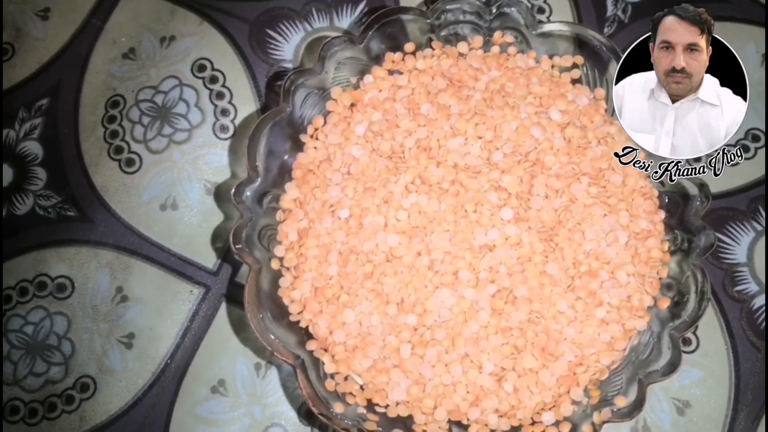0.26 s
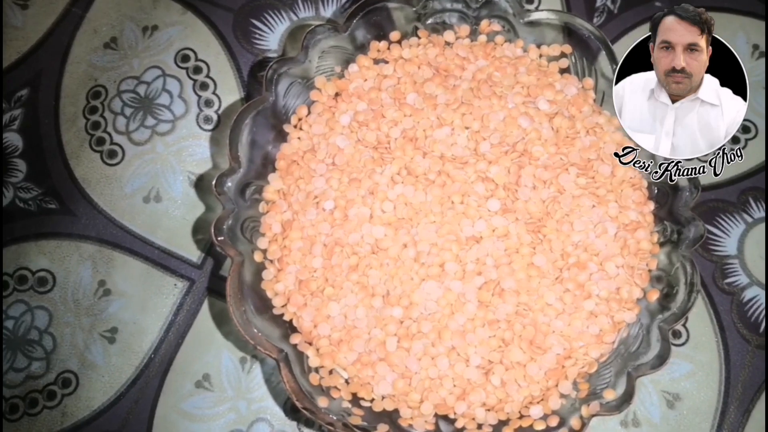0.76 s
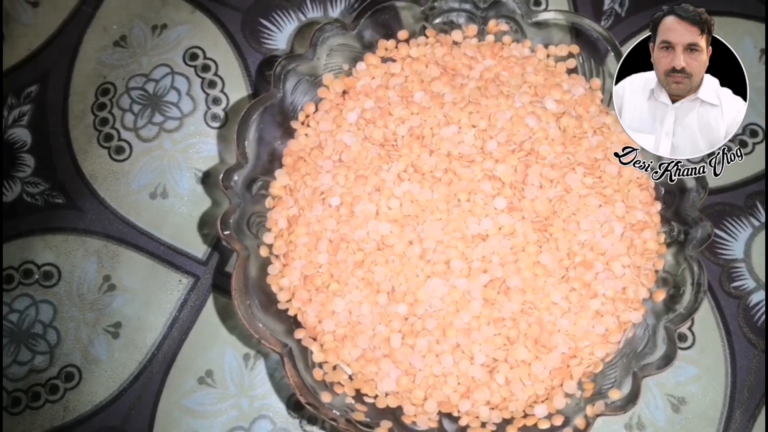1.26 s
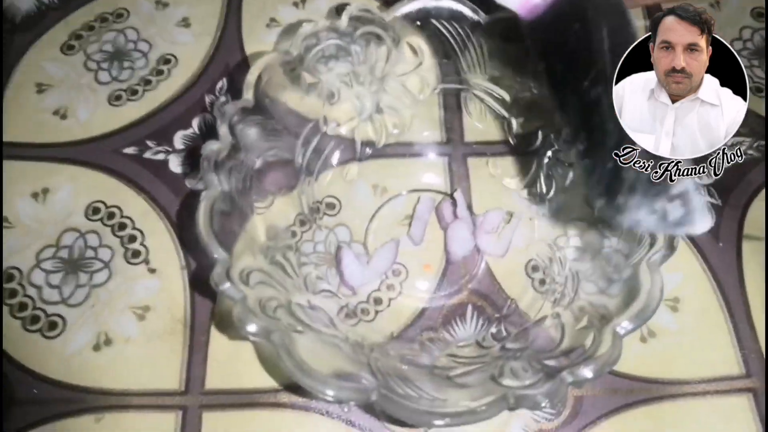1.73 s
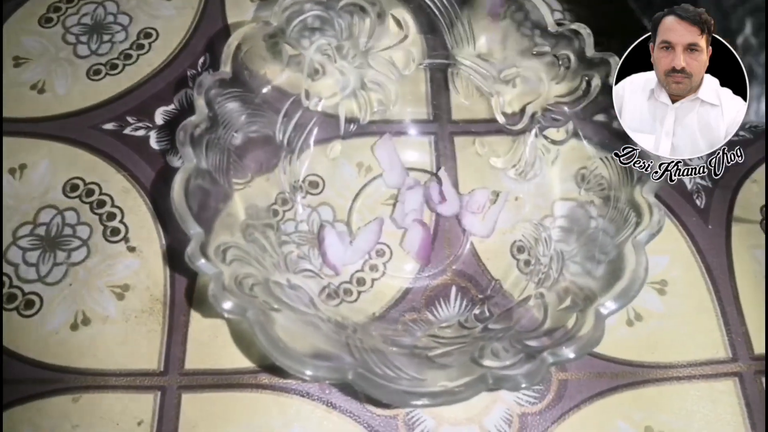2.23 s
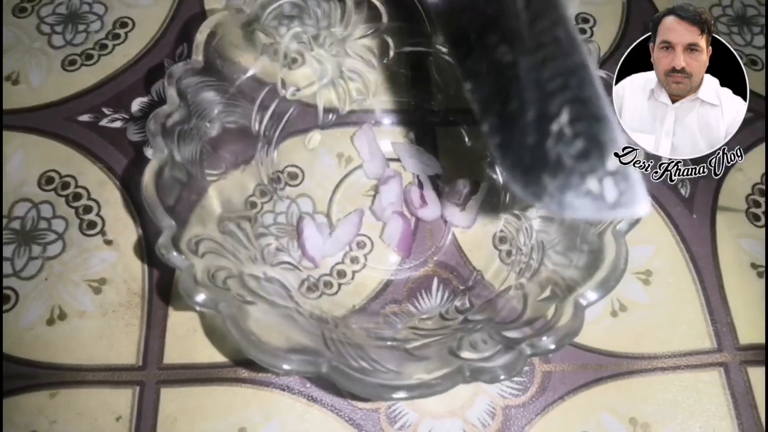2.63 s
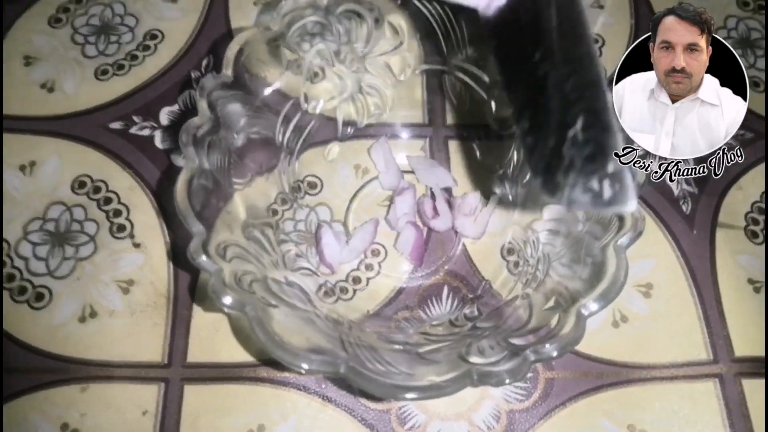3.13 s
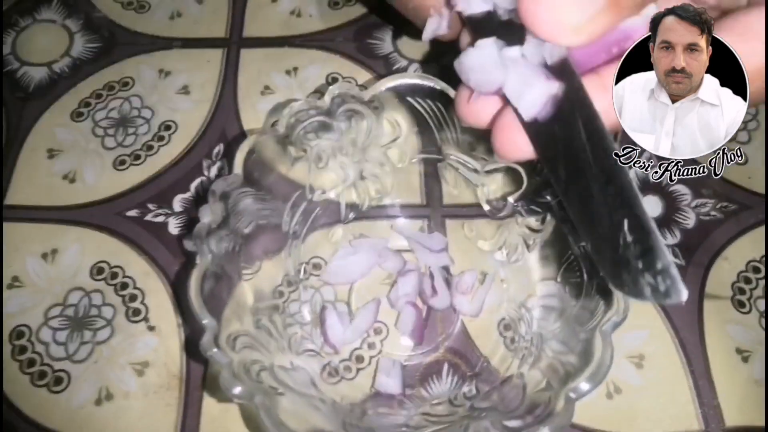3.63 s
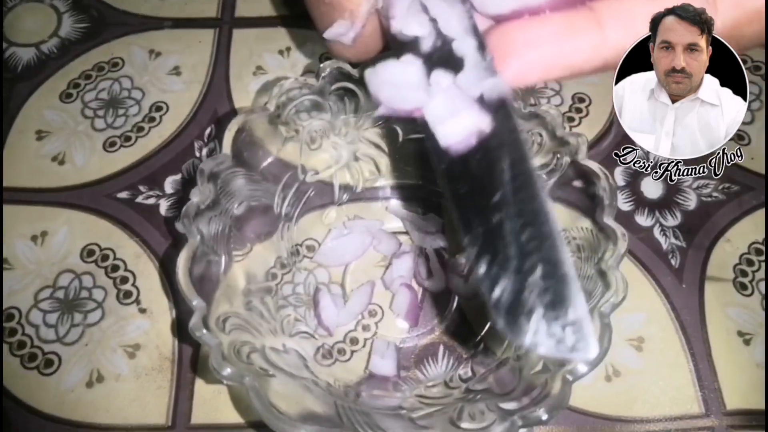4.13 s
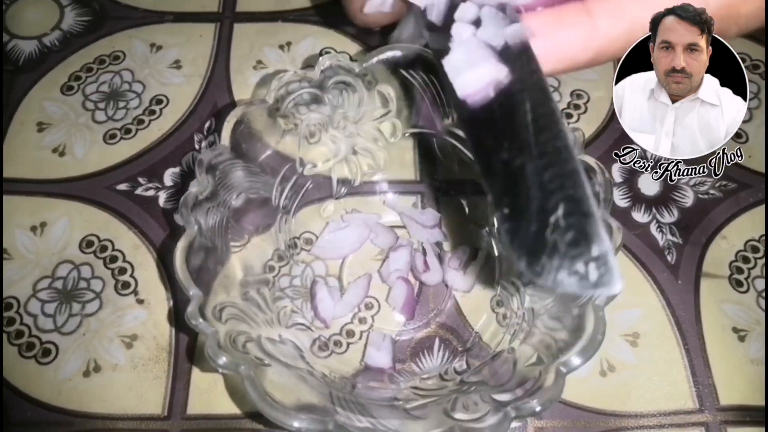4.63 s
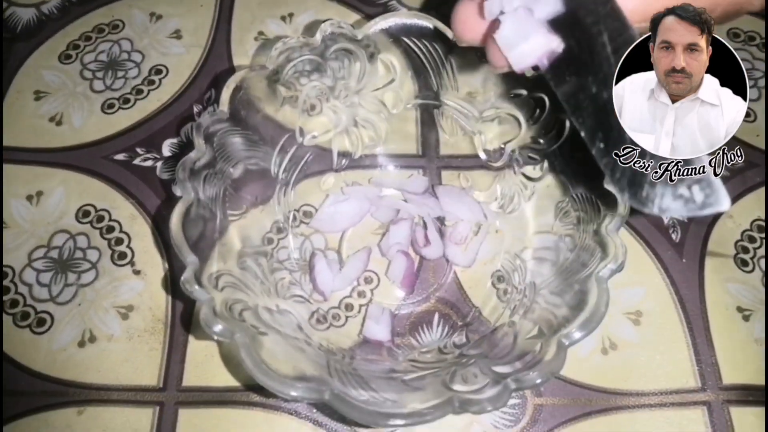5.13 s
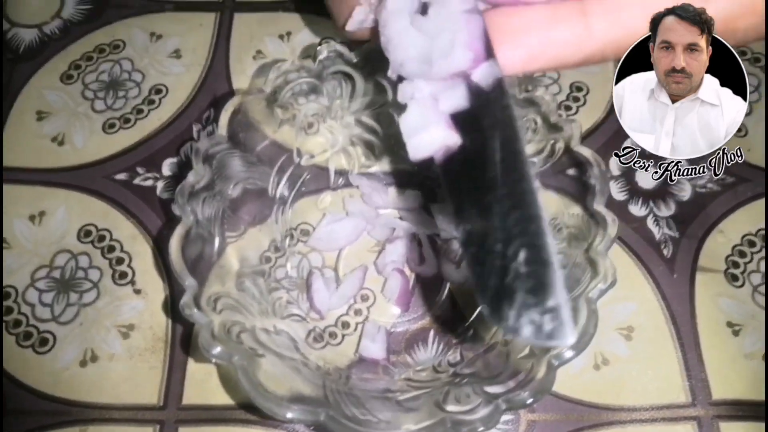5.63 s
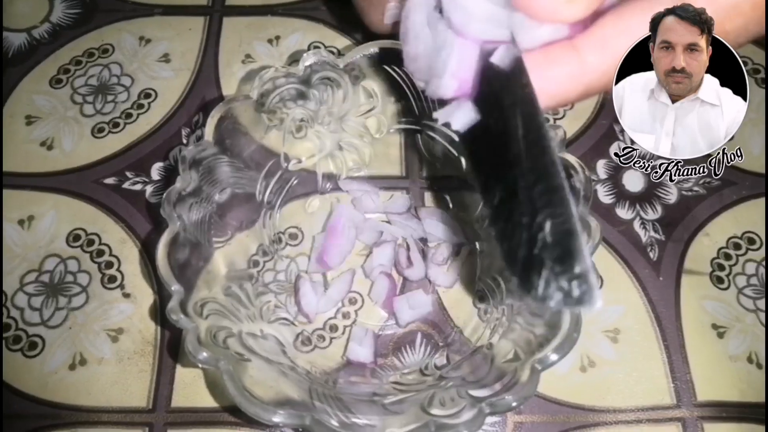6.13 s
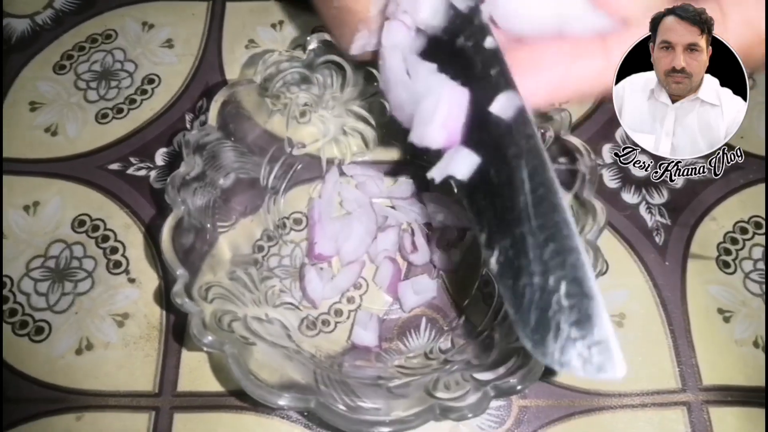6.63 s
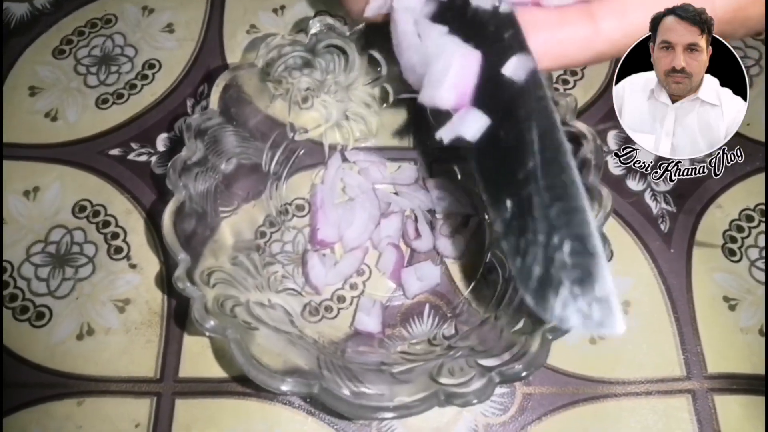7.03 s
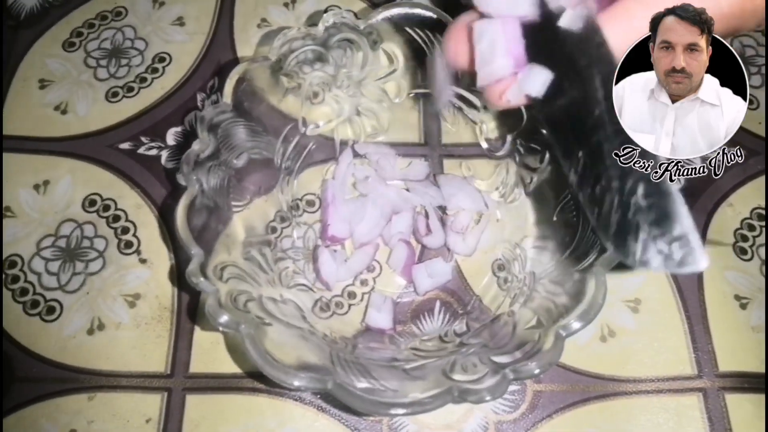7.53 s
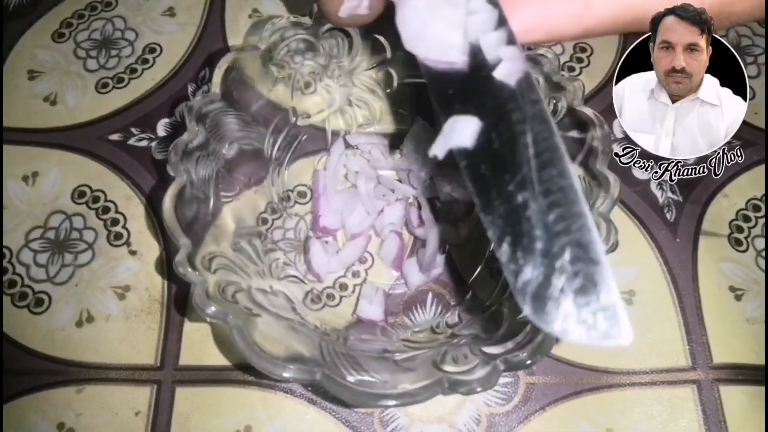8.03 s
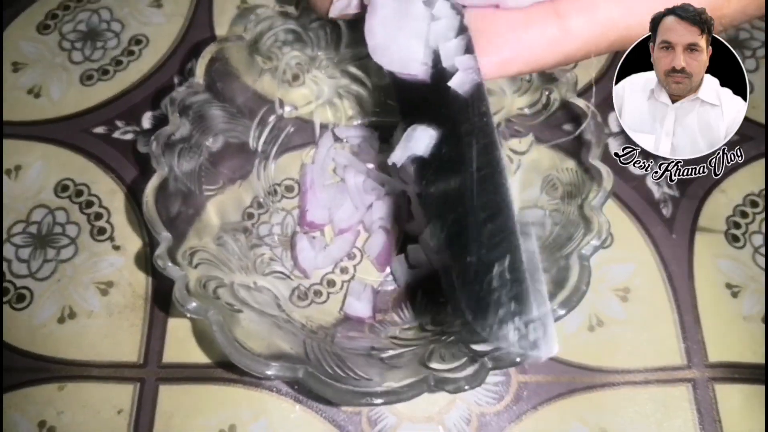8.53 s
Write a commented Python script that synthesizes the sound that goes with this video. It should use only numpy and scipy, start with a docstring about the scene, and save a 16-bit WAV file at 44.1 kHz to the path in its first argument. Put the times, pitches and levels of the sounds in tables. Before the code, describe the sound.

In a small, slightly echoing room, a close hand-held microphone picks up dry lentils in a glass bowl. Faint sliding comes first, then two loud gritty scuffs with a glassy ring at about 0.1 and 0.25 seconds. From 0.4 to 1.3 seconds lentils swish softly and tick sharply, ending with a short dull knock near 1.27. Total silence falls from 1.37 to 1.77. Then a far quieter scene: irregular short knife crunches through onion, a few each second, crisp and moist, climbing slightly, with rasp and fine fizz. Juice sprays faintly near 2.8, 4.7 and 8.55. Cuts are stronger around 4.8, 6.5, 8.0 and 8.6. Tiny ticks and weak knocks land between them, including near 6.1 and 6.5. Faint rustle and a wavering low hum continue, with handling rumble swelling around 7.3 to 7.6.

```python
"""A kitchen knife crunches through an onion over a glass bowl: bursts of tiny fractures, resonated and coloured.
Before it, dry lentils slide and tick as small contacts in a glass bowl whose scuffs ring its modes.
A short silence parts the two scenes. Juice fizzes, bits tick and a few knocks land among the cuts.
A small room with short echoes, a close hand-held microphone that rumbles, a faint rustle throughout,
and a low hum behind the onion."""
import sys
import numpy as np
from scipy import signal
from scipy.io import wavfile
from scipy.ndimage import uniform_filter1d

SR = 44100
rng = np.random.default_rng(int(sys.argv[2]) if len(sys.argv) > 2 else 0)


def digitize_waveform(pressure):
    """Quantize a signal to 16-bit integers and store it at the path in sys.argv[1].

    Rows of a 2-D input are taken as channels; values are limited to [-1, 1].
    """
    field = np.atleast_2d(pressure).T
    bounded = np.clip(field, -1, 1)
    quanta = np.round(bounded * 32767).astype(np.int16)
    wavfile.write(sys.argv[1], SR, quanta)


N = 387146
TIME = np.arange(N) / SR

# Lentils sliding over each other. Each row: start in seconds, length in seconds, level in dB, pitch in Hz.
LENTIL_SLIDES = [(0, 0.057, -48, 1880), (0.052, .07, -40, 1640), (0.389, 0.093, -44, 2460),
                 (0.476, 0.049, -40.5, 2060), (0.563, 0.097, -42.5, 2100), (0.729, .19, -49, 2300),
                 (1.016, 0.15, -43, 2650), (1.313, 0.053, -40, 2400)]
# The bowl scuffing over the table. Each row: start, peak and end in seconds, level in dB,
# contact point on the bowl (0-1), fall from the peak to the end in dB.
BOWL_SCUFFS = [(0.099, 0.115, 0.22, -27, 0, 16), (0.251, 0.263, 0.36, -27.5, 0.82, 5.5)]
# Modes of the glass. Each row: pitch in Hz, time to fall 60 dB in seconds,
# relative level in dB when touched at contact point 0, and at contact point 1.
GLASS_MODES = [(716, 0.23, -14.5, 2), (1223, 0.15, -19.5, 11.5), (1310, 0.082, -11, 7),
               (1634, 0.05, -3.5, 14.5), (1696, 0.25, 8.5, 1), (1821, 0.1, 13.5, -7.5),
               (2166, 0.21, 4, -13), (2552, 0.097, -11, 14.5), (2850, 0.13, -9.5, 3), (3365, 0.19, 8, -9.5),
               (4644, 0.049, 6, 0)]
# Single lentils and bits of onion that tick. Each row: time in seconds, peak in dB ahead of the room.
LOUD_TICKS = [(0.4546, -20.5), (0.515, -21.5), (0.565, -22), (0.7274, -28.5), (0.7782, -27), (0.8533, -28),
              (1.2068, -31.5), (1.311, -27.5), (2.82, -43.5), (3.147, -36), (4.5078, -40), (6.915, -47)]
# Dull knocks on the bowl. Each row: time in seconds, level of the note in dB, pitch in Hz, decay time in seconds.
BOWL_KNOCKS = [(1.271, -26.5, 1274, 0.0092), (2.465, -50, 1035, 0.011), (6.075, -50.5, 880, 0.0025),
               (6.468, -44, 1040, 0.0015)]
# Knife strokes. Each row: start in seconds, length in seconds, place of the peak (0-1), crunch level in dB,
# crunch pitch at the start in Hz, rasp level in dB, fizz level in dB.
KNIFE_STROKES = [(1.763, 0.016, 0.05, -49.5, 2620, -48, -50), (2.037, .04, 0.6, -52.5, 2070, -68, -73),
                 (2.112, 0.1, .65, -50.5, 2200, -62, -60.5), (2.277, 0.12, 0.08, -51.5, 1990, -53.5, -56.5),
                 (2.464, 0.17, 0.3, -53.5, 2020, -60, -64), (2.68, 0.17, 0.54, -52, 1750, -59, -60.5),
                 (2.894, 0.18, 0.32, -44.5, 1590, -50.5, -53), (3.064, 0.096, 0.3, -59, 1810, -56.5, -56.5),
                 (3.23, 0.077, 0.7, -55.5, 1880, -68, -65), (3.348, 0.07, .4, -55, 2250, -57, -55),
                 (3.593, 0.1, 0.22, -43.5, 2000, -44.5, -66), (3.77, 0.12, 0, -57.5, 1950, -59.5, -59.5),
                 (3.939, 0.083, 0.2, -53, 1830, -62, -61), (4.1, .11, 0.14, -46, 1800, -49.5, -54),
                 (4.337, 0.071, .5, -57, 2150, -62, -73), (4.61, 0.12, .45, -50, 2500, -52, -54.5),
                 (4.764, 0.1, 0.24, -41.5, 1800, -49.5, -59), (4.846, .11, 0.48, -36.5, 1970, -45, -48),
                 (4.982, 0.068, 0.98, -43.5, 1920, -51.5, -52), (5.178, .16, 0.75, -47.5, 1910, -50, -57.5),
                 (5.38, 0.17, 0.33, -47.5, 1850, -52, -59), (5.535, 0.13, 0.55, -51, 2540, -49.5, -56),
                 (5.788, .13, 0.22, -51.5, 1890, -55, -56), (5.9, 0.17, 0.56, -51, 2660, -64, -57.5),
                 (6.202, 0.13, 0.2, -45.5, 1780, -50, -51), (6.329, 0.086, 0.12, -42.5, 2060, -49.5, -63),
                 (6.549, 0.095, 0.4, -40, 2340, -44.5, -54), (6.827, 0.11, 0.7, -54, 1630, -77, -68),
                 (6.916, 0.07, 0.3, -46, 2070, -55, -53.5), (6.989, 0.062, 0.04, -50, 2500, -47, -52.5),
                 (7.119, 0.047, .45, -52.5, 2500, -66, -61), (7.448, 0.13, 0.18, -52.5, 2080, -51, -62),
                 (7.541, .11, 0.23, -43, 2280, -47.5, -51), (7.736, 0.1, 0.5, -55.5, 2210, -54.5, -59),
                 (7.882, 0.12, 0.2, -49.5, 1740, -57.5, -60.5),
                 (8.015, 0.079, 0.16, -41.5, 1480, -51, -57.5), (8.323, 0.25, 0.26, -48, 2070, -53.5, -64),
                 (8.591, 0.17, 0.11, -40.5, 1660, -46, -49)]
# Spurts of juice. Each row: start in seconds, level in dB, pitch in Hz, decay time in seconds.
JUICE_SPURTS = [(2.819, -54, 7300, 0.074), (4.694, -57.5, 11900, 0.15), (8.555, -55.5, 6600, 0.14)]
# Body of the onion, also used on the lentils' swish. Each row: frequency in Hz, gain in dB.
BODY_SPECTRUM = [(520, -16.5), (820, 2), (2700, 8), (4500, -6.5)]
# Wet fizz of the cut. Each row: frequency in Hz, gain in dB.
FIZZ_SPECTRUM = [(3000, -24), (4700, 10), (5700, 2), (7800, -4.5), (8600, -15.5), (15000, -18)]
# Grit of lentils under a scuff. Each row: frequency in Hz, gain in dB.
GRIT_SPECTRUM = [(100, -47), (480, -14), (620, -21.5), (950, -21), (1300, -5.5), (1900, -2), (3300, -4),
                 (4000, -18), (5700, -13.5), (8500, -33), (15000, -48)]
# One hard little contact. Each row: frequency in Hz, gain in dB.
SNAP_SPECTRUM = [(900, -17.5), (2500, 4), (7000, -1.5), (10000, -20)]
# Faint rustle near the microphone. Each row: frequency in Hz, gain in dB.
RUSTLE_SPECTRUM = [(25, 2.5), (118, -15.5), (190, -7), (404, -11.5), (543, -18), (1100, -10.5),
                   (2300, -0.5), (7280, -13), (8550, -20), (15000, -23.5)]
# Rumble of the hand-held microphone. Each row: frequency in Hz, gain in dB.
RUMBLE_SPECTRUM = [(20, -5), (60, 2.5), (200, -7.5), (350, -12.5), (700, -38)]
# How hard the microphone is handled. Each row: time in seconds, mean rumble level in dB.
HANDLING_LEVEL = [(1.2, -63.5), (1.8, -71), (2.7, -70.5), (2.95, -61), (4, -70.5), (7.2, -66), (7.3, -52),
                  (7.64, -55), (7.75, -69)]
# Moments when the hands rest and their rustle dips. Each entry: time in seconds.
HAND_RESTS = [2.25, 3.745, 3.91, 4.285, 5.135, 7.85, 8.19]
# Tail of the small room. Each row: frequency in Hz, time to fall 60 dB in seconds.
ROOM_DECAY = [(200, 0.55), (2100, 0.17), (5500, 0.34), (14000, 0.019)]

SILENCE_START_S, SILENCE_END_S = 1.369, 1.766
EDGE_HZ = 15400  # top of the treble
RUSTLE_DB, HUM_DB, HUM_HZ = -54.5, -71.5, 174  # mean levels and pitch
STRAY_FROM_S, STRAY_TO_S, STRAY_DB = .44, 1.2, -37  # lentils that tick at random; their mean peak level
SWELL_DB, EASE_DB, RELEASE_S = 6.5, 7.5, 0.011  # a stroke grows to its peak, eases and lets go
BITE_DB, BITE_S = 1, 0.0094  # stronger first fractures as the blade enters, and their decay time
CATCH_DB, CATCH_S = 12, 0.0012  # brief extra burst of fizz as the blade bites, and its decay time
GLIDE_PER_S = 1.4  # climb of the crunch, in natural log of pitch each second
WANDER, WANDER_PER_S = 0.093, 41  # wavering pitch: share of the pitch, changes each second
WIDTH_HZ, USUAL_DB, WIDEN_PER_DB = 930, -49, .025  # crunch width at the usual level; harder strokes are wider
RASP_HZ, RASP_WIDTH_HZ, RASP_FOLLOW = 3310, 1350, 0.41  # upper resonance; how far it follows the crunch


def gain_of(db):
    """Decibels to amplitude."""
    return 10 ** (np.asarray(db) / 20)


def evened(x):
    """Scales to rms 1."""
    return x / np.sqrt(np.mean(x ** 2) + 1e-20)


def over(x, length):
    """Scales a sound so that its energy equals rms 1 held for the given time (at least 10 ms)."""
    return x / np.sqrt(np.sum(x ** 2) / (max(length, .01) * SR) + 1e-20)


def read(points, hz):
    """Reads a table on a log-frequency axis."""
    f, value = np.transpose(points)
    return np.interp(np.log(hz + 1), np.log(f + 1), value)


def add(mix, s, sound):
    """Mixes a sound in at time s."""
    part = mix[max(round(s * SR), 0):][:len(sound)]
    part += sound[:len(part)]


def colour(x, points, size=4096):
    """Causal minimum-phase filter with the given spectrum, so that clicks stay sharp."""
    hz = abs(np.fft.fftfreq(size, 1 / SR))
    log_gain = np.log(gain_of(read(points, hz)))
    response = np.exp(np.conj(signal.hilbert(log_gain)))
    taps = np.fft.ifft(response).real[:size // 2]
    return signal.fftconvolve(x, taps)[:len(x)]


def resonate(x, hz, width):
    """A resonance of gain 1 that can follow a moving pitch: shift to zero, smooth, shift back."""
    turn = np.exp(2j * np.pi * np.cumsum(hz * np.ones(len(x))) / SR)
    r = np.exp(-np.pi * width / SR)
    return 2 * (turn * signal.lfilter([1 - r], [1, -r], x / turn + 1e-18)).real


def band(x, hz, width):
    """A resonance applied twice, for steep sides."""
    return resonate(resonate(x, hz, width), hz, width)


def drift(t, rate):
    """Random wander of about unit size, with the given number of turning points each second."""
    knots = rng.standard_normal(4096)
    return np.interp(t * rate, np.arange(len(knots)), knots)


def crackle(t, per_s, spread_db, clump_db, clumps_per_s=130):
    """Tiny fractures or slips of uneven size, whose strength comes in clumps."""
    spread = spread_db * np.minimum(rng.exponential(1, len(t)), 4)
    size = gain_of(spread + clump_db * drift(t, clumps_per_s))
    sign = rng.choice([-1, 1], len(t))
    return size * sign * (rng.random(len(t)) < per_s / SR)


def push(t, rise, length, start_db, fall_db, release):
    """Force of one movement: it grows to a peak, eases and lets go."""
    moments = [0, max(rise, .002), max(length, rise + .004)]
    level_db = np.interp(t, moments, [-start_db, 0, -fall_db])
    return gain_of(level_db) * np.exp(-np.maximum(t - length, 0) / release)


def slides(per_s=2200, spread_db=2.0, clump_db=2, width_hz=1600, peak=0.67, snap_db=-6):
    """Lentils pour over each other: separate hard little contacts inside a hollow swish."""
    out, t = np.zeros(N), np.arange(SR // 2) / SR
    for start, length, db, hz in LENTIL_SLIDES:
        force = push(t, peak * length, length, 3.5, 9, RELEASE_S)
        grains = crackle(t, per_s, spread_db, clump_db) * force
        swish = over(colour(band(grains, hz, width_hz), BODY_SPECTRUM), length)
        snaps = over(colour(grains, SNAP_SPECTRUM), length)
        add(out, start, gain_of(db) * (swish + gain_of(snap_db) * snaps))
    return out


def background(sway_db=-0.5, lumps_db=2):
    """A crackling rustle that dips when the hands rest, a wavering hum and the rumble of handling."""
    rustle = evened(colour(crackle(TIME, 14000, 3.8, 1.0), RUSTLE_SPECTRUM))
    rustle *= gain_of(RUSTLE_DB + sway_db * drift(TIME, 20))
    rest = sum(np.exp(-((TIME - s) * 20) ** 2) for s in HAND_RESTS)
    turns = np.cumsum(HUM_HZ + 4 * drift(TIME, 16)) / SR
    hum = gain_of(HUM_DB + 1.8 * drift(TIME, 14)) * evened(np.sin(2 * np.pi * turns))
    handling_db = np.interp(TIME, *np.transpose(HANDLING_LEVEL)) + lumps_db * drift(TIME, 25)
    rumble = gain_of(handling_db) * evened(colour(rng.standard_normal(N), RUMBLE_SPECTRUM))
    return rustle * gain_of(-6 * rest) + hum * (TIME > SILENCE_END_S) + rumble


def room(x, wet_db):
    """The small room adds a dense tail of random echoes, each band dying at its own speed."""
    taps = rng.choice([-1., 1.], SR // 2) * (rng.random(SR // 2) < 4000 / SR)
    taps[:round(.004 * SR)] = 0  # gap ahead of the first echo
    hz, t, z = signal.stft(taps, SR, nperseg=256)
    decay = gain_of(-60 * t / read(ROOM_DECAY, hz)[:, None])
    tail = signal.istft(z * decay, SR, nperseg=256)[1]
    echoes = signal.fftconvolve(x, tail / np.linalg.norm(tail))[:N]
    wet = gain_of(wet_db)
    return (x + wet * echoes) / np.hypot(1, wet)


def scuffs(ring_db=-6.0, grit_db=-3):
    """The foot of the bowl sticks and slips; each slip rings the glass and rattles the lentils."""
    out, t = np.zeros(N), np.arange(SR // 2) / SR
    for start, peak, end, db, contact, fall_db in BOWL_SCUFFS:
        length = end - start
        slips = crackle(t, 2600, 1.44, 1.4) * push(t, peak - start, length, 7.5, fall_db, .02)
        blow = colour(slips, [(5000, 1.0), (9000, -23.5)])
        blow *= np.exp(-t / 0.16)  # later slips strike the glass more weakly
        ring = np.zeros(len(t))
        for hz, t60, db_at_0, db_at_1 in GLASS_MODES:
            mode_db = db_at_0 + contact * (db_at_1 - db_at_0)
            ring += gain_of(mode_db) * evened(resonate(blow, hz, 2.2 / t60))
        ring = over(ring, length)
        grit = over(colour(slips, GRIT_SPECTRUM), length)
        add(out, start, gain_of(db) * (gain_of(ring_db) * ring + gain_of(grit_db) * grit))
    return out


def ticks(snap_s=0.0018, spread_db=3, count=26):
    """Each tick is a dying snap of coloured noise; fainter strays fall at random among the lentils."""
    out, t = np.zeros(N), np.arange(2048) / SR
    strays = []
    for _ in range(count):
        s = rng.uniform(STRAY_FROM_S, STRAY_TO_S)
        strays.append((s, STRAY_DB + spread_db * rng.standard_normal()))
    for s, db in list(LOUD_TICKS) + strays:
        snap = colour(rng.standard_normal(len(t)) * np.exp(-t / snap_s), SNAP_SPECTRUM)
        add(out, s, gain_of(db) * snap / abs(snap).max())
    return out


def knocks(thump_hz=420, thump_width_hz=380, thump_s=0.03, thump_db=-20, crack_db=-10):
    """A damped note of the bowl, a thump of the table and a rattle of contact."""
    out, t = np.zeros(N), np.arange(SR // 5) / SR
    for s, db, hz, ring_s in BOWL_KNOCKS:
        contact = rng.standard_normal(len(t))
        note = np.sin(2 * np.pi * hz * t) * np.exp(-t / ring_s)
        thump = resonate(resonate(contact, thump_hz, thump_width_hz), thump_hz, 2 * thump_width_hz)
        thump = evened(thump) * np.exp(-t / thump_s)
        crack = resonate(resonate(contact, 1.06 * hz, 330), 2.3 * hz, 1700)
        crack = evened(crack) * np.exp(-t / (6 * ring_s))
        add(out, s, gain_of(db) * (note + gain_of(thump_db) * thump + gain_of(crack_db) * crack))
    return out


def strokes(per_s=2800, spread_db=2, clump_db=1.0, fizz_grain_db=4.5):
    """Each stroke is a burst of tiny fractures heard as a climbing crunch, a higher rasp and a wet fizz."""
    out, t = np.zeros(N), np.arange(SR // 2) / SR
    for start, length, peak, db, start_hz, rasp_db, fizz_db in KNIFE_STROKES:
        force = push(t, peak * length, length, SWELL_DB, EASE_DB, RELEASE_S)
        bite = gain_of(BITE_DB * np.exp(-t / BITE_S))
        clicks = crackle(t, per_s, spread_db, clump_db) * force * bite

        climb = GLIDE_PER_S * np.minimum(t, length)
        hz = start_hz * np.exp(climb + WANDER * drift(t, WANDER_PER_S))
        width_hz = WIDTH_HZ * np.exp(WIDEN_PER_DB * (db - USUAL_DB))
        crunch = colour(band(clicks, hz, width_hz), BODY_SPECTRUM)

        rasp = band(clicks, RASP_HZ * (hz / start_hz) ** RASP_FOLLOW, RASP_WIDTH_HZ)
        rasp *= np.minimum(.5 + t / length, 1)  # the rasp comes up later than the crunch

        catch_db = CATCH_DB * np.exp(-t / CATCH_S)
        grain_gain = gain_of(catch_db + fizz_grain_db * drift(t, 1500))
        fizz = colour(clicks / np.sqrt(force) * grain_gain, FIZZ_SPECTRUM)  # follows the force less closely

        for level_db, layer in (db, crunch), (rasp_db, rasp), (fizz_db, fizz):
            add(out, start, gain_of(level_db) * over(layer, length))
    return out


def hollow(x, ring_db=-6.5, width_hz=28):
    """The glass below answers at the pitches of its own modes, with the overall level kept."""
    answer = sum(gain_of(ring_db) * resonate(x, mode[0], width_hz) for mode in GLASS_MODES)
    return evened(x + answer) * np.sqrt(np.mean(x ** 2))


def spurts(width_hz=4500, burst_db=9):
    """Juice sprays as the blade breaks into a fresh layer: a sudden fizz that dies away."""
    out, t = np.zeros(N), np.arange(SR // 2) / SR
    for s, db, hz, decay_s in JUICE_SPURTS:
        burst = gain_of(burst_db * np.exp(-t / BITE_S))
        spray = crackle(t, 9000, 2.5, 2.6) * np.exp(-t / decay_s) * burst
        add(out, s, gain_of(db) * over(band(spray, hz, width_hz), decay_s))
    return out


def scene():
    """Lentils, then onion, in a small room, heard in mono on both channels."""
    onion = room(hollow(strokes() + spurts()), wet_db=-8.5)
    lentils = room(slides() + scuffs() + ticks() + knocks(), wet_db=-9.0)  # knocks also fall among the cuts
    mix = onion + lentils + background()
    return np.array([mix, mix])


def record(dry):
    """The sound stops between the two scenes, with edges of about 1 ms; then the treble is cut off."""
    sounding = (TIME < SILENCE_START_S) | (TIME > SILENCE_END_S)
    running = uniform_filter1d(sounding * 1., size=40)
    low_pass = signal.firwin(511, EDGE_HZ, window=("kaiser", 9), fs=SR)
    return signal.oaconvolve(dry * running, low_pass[None], "same")


dry = scene()
out = record(dry)
digitize_waveform(out)
```